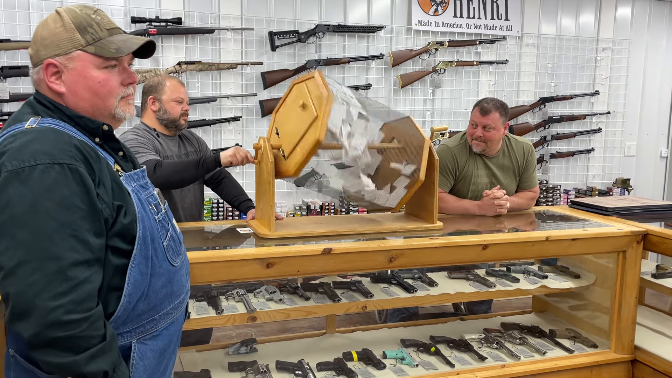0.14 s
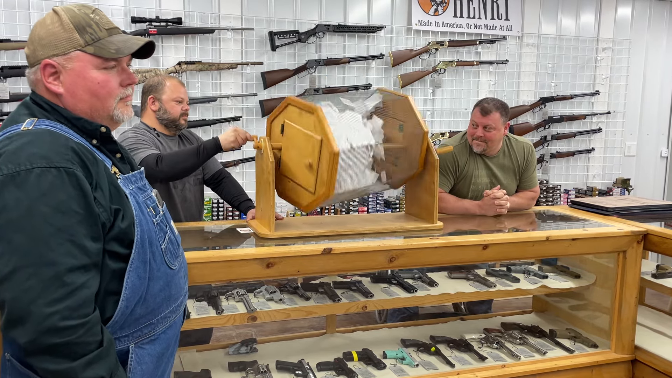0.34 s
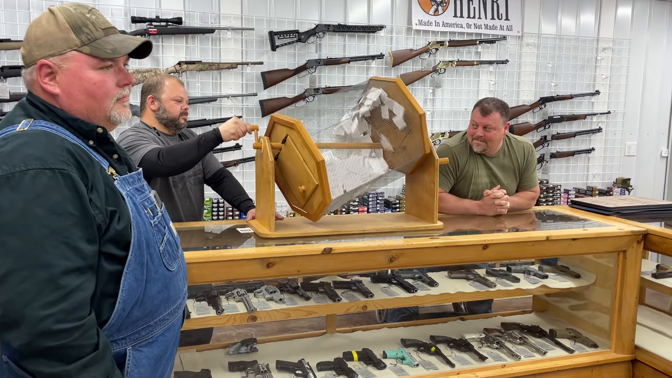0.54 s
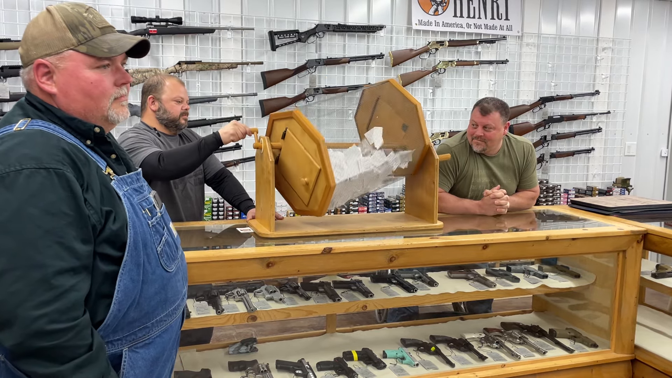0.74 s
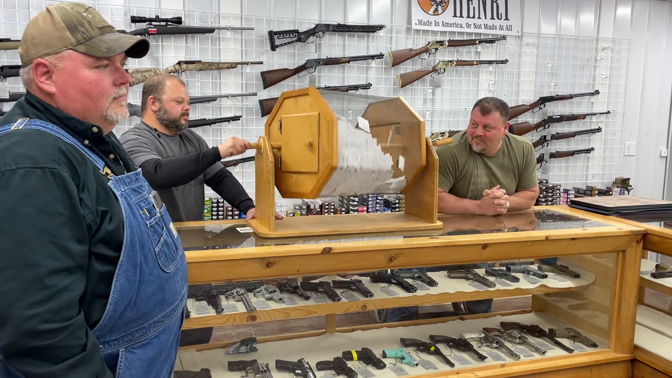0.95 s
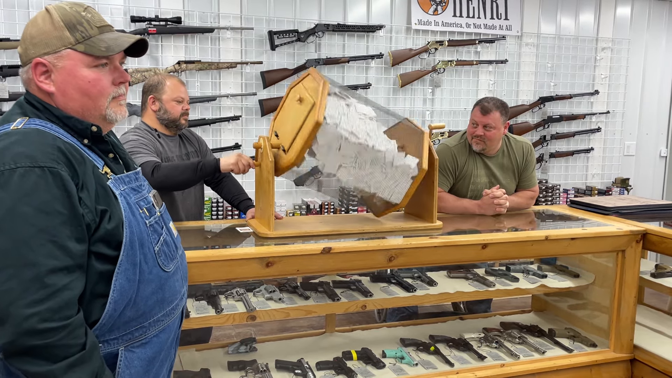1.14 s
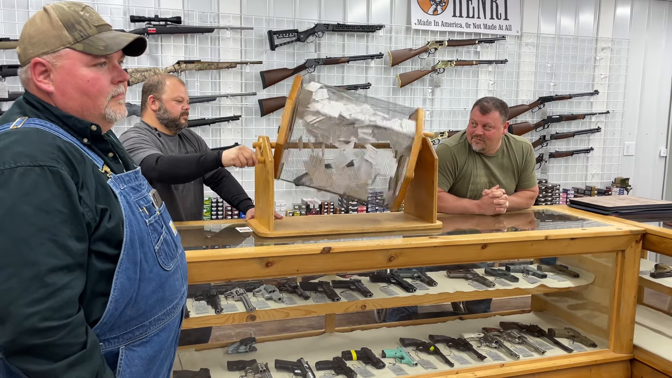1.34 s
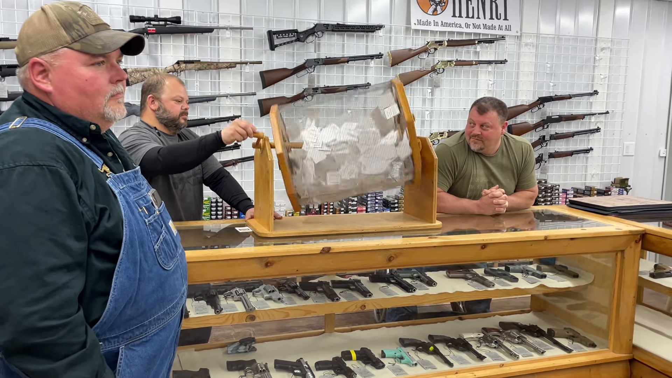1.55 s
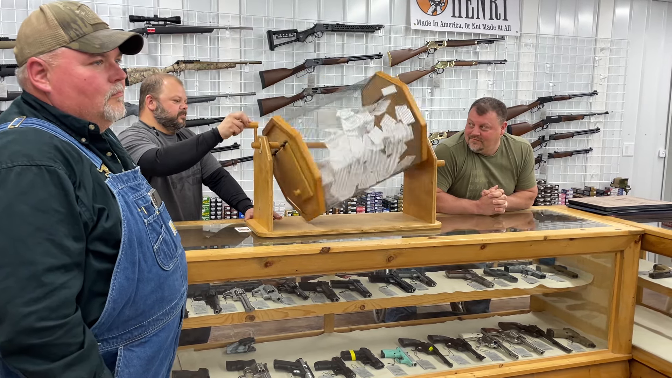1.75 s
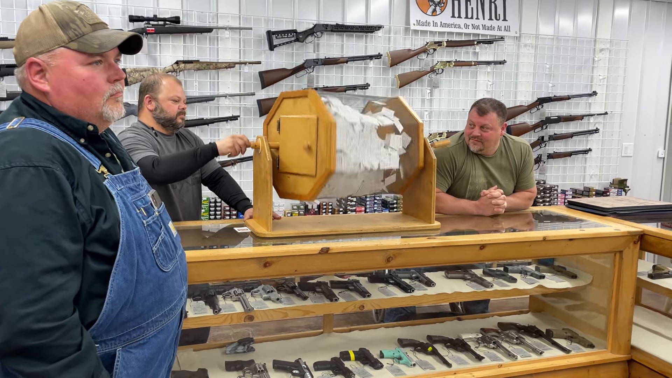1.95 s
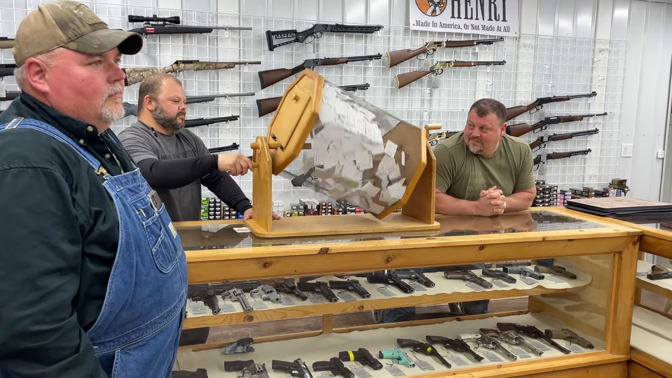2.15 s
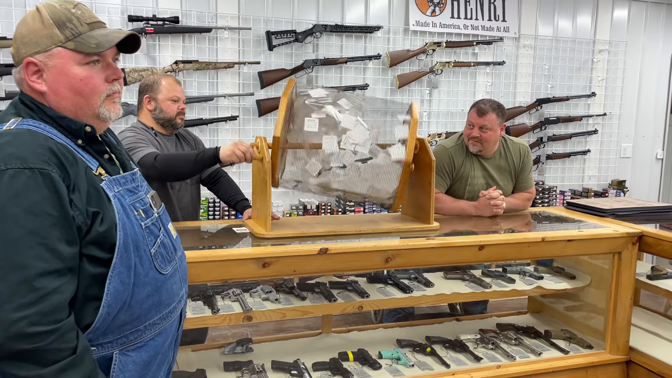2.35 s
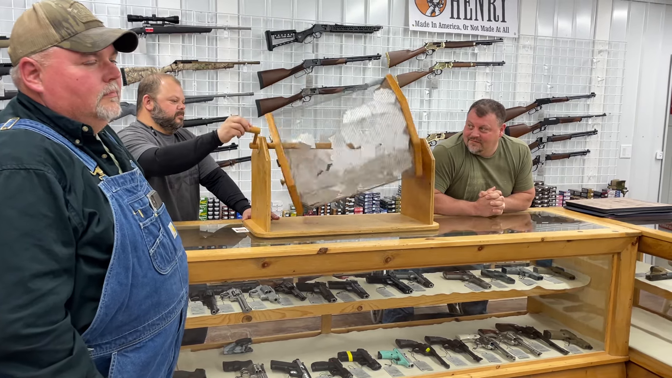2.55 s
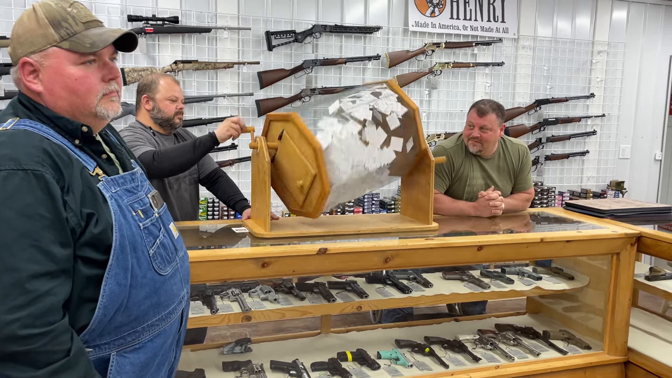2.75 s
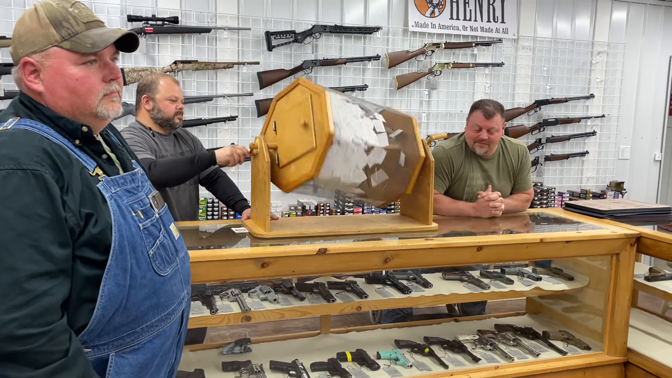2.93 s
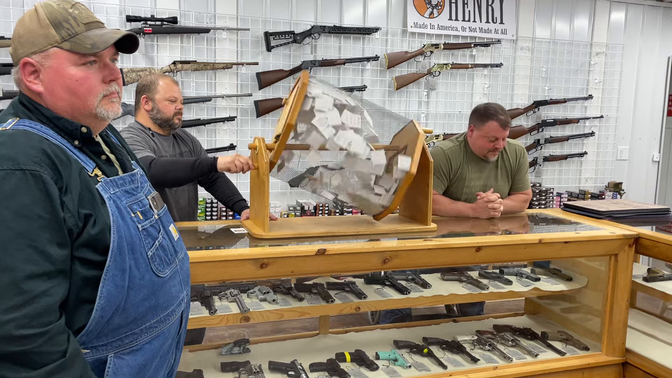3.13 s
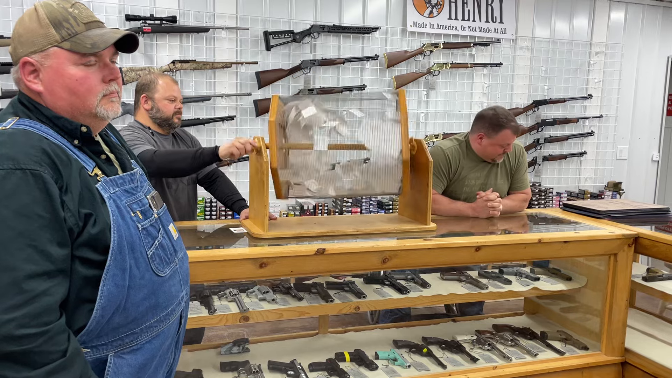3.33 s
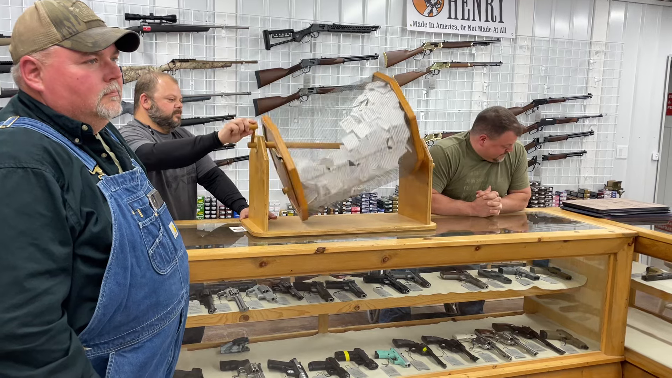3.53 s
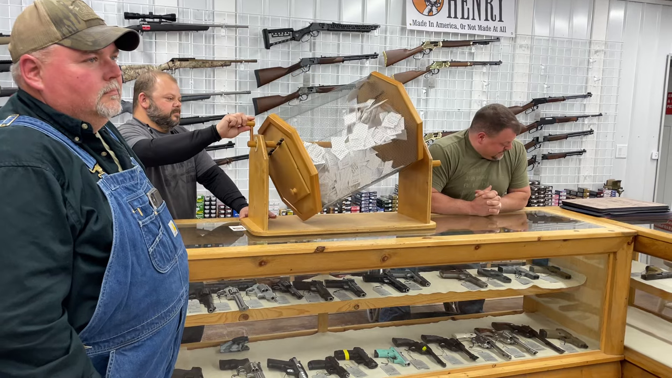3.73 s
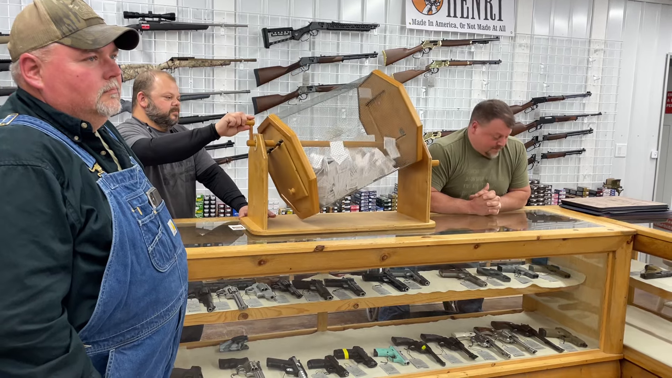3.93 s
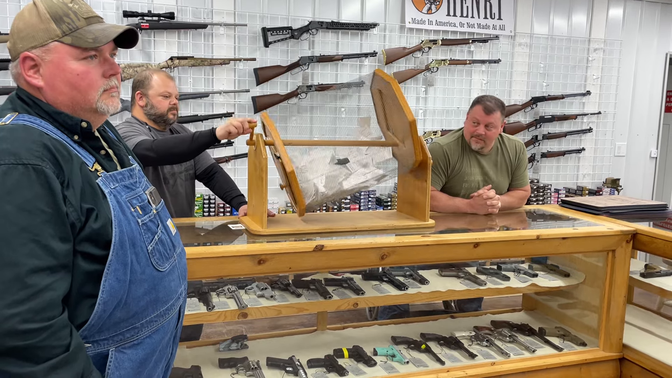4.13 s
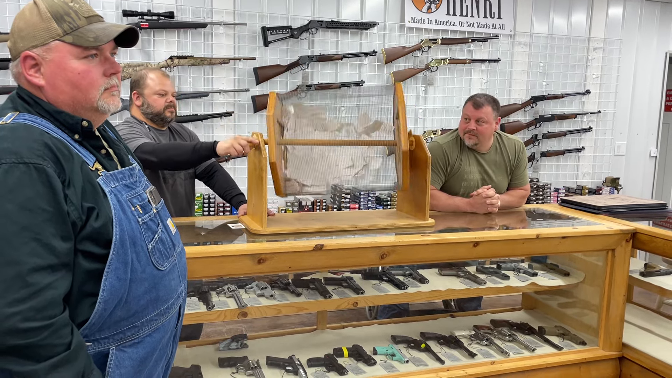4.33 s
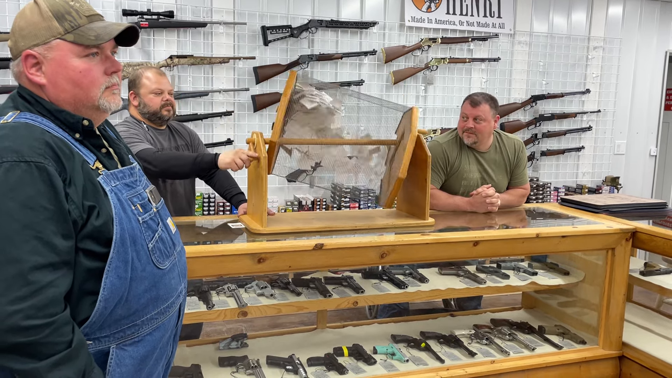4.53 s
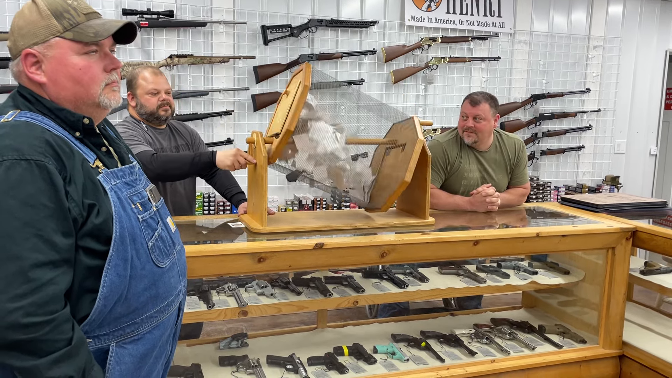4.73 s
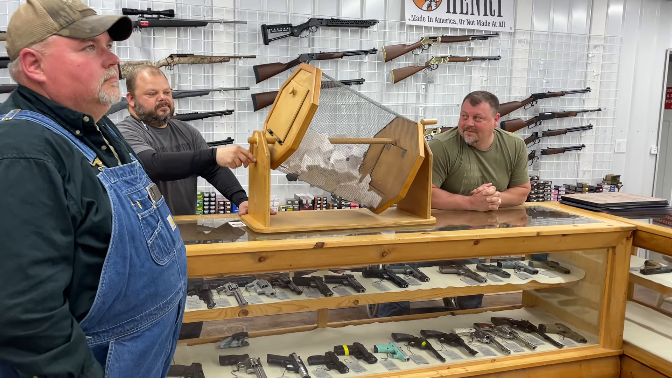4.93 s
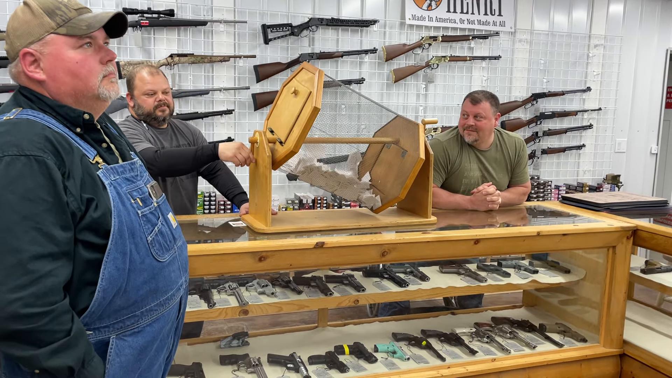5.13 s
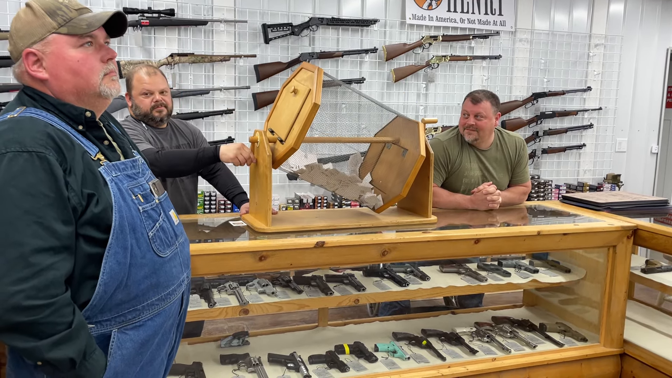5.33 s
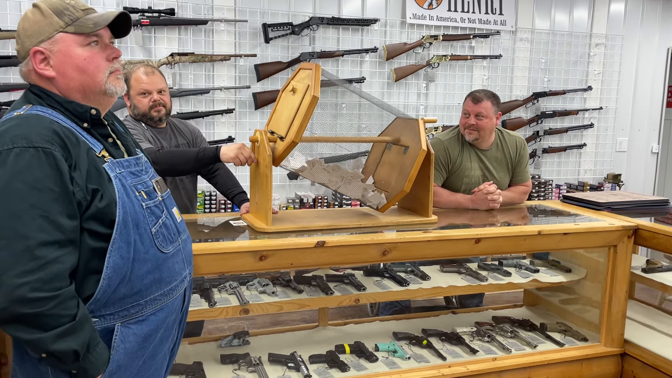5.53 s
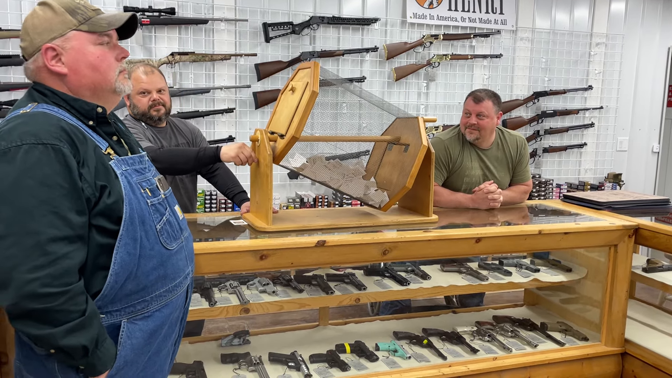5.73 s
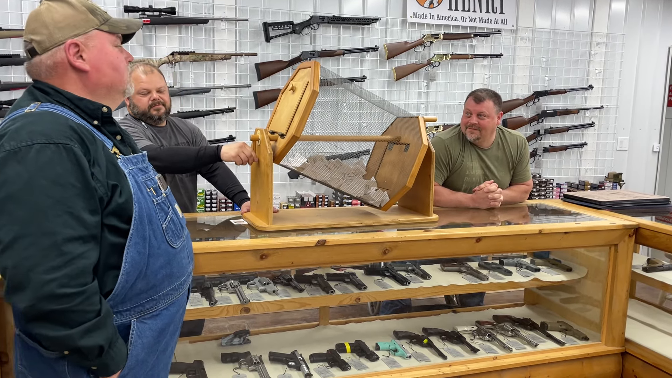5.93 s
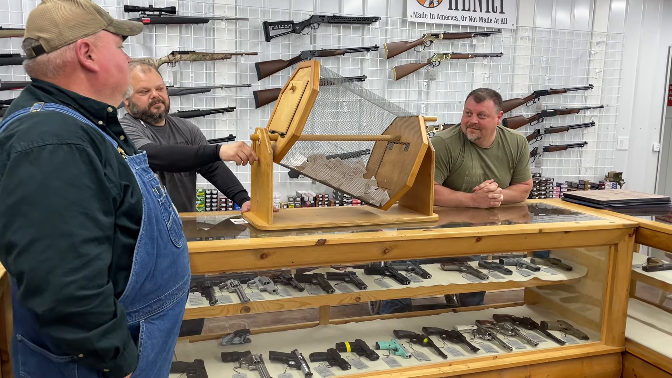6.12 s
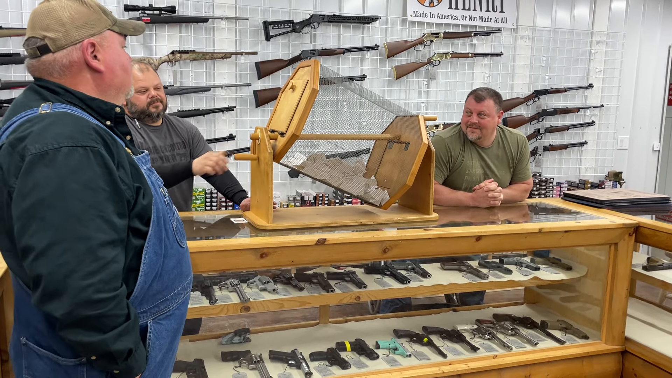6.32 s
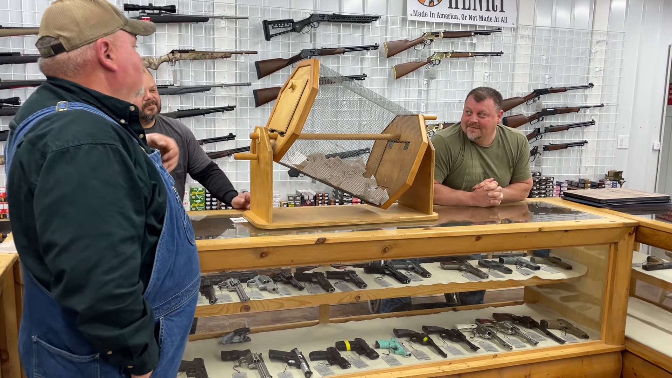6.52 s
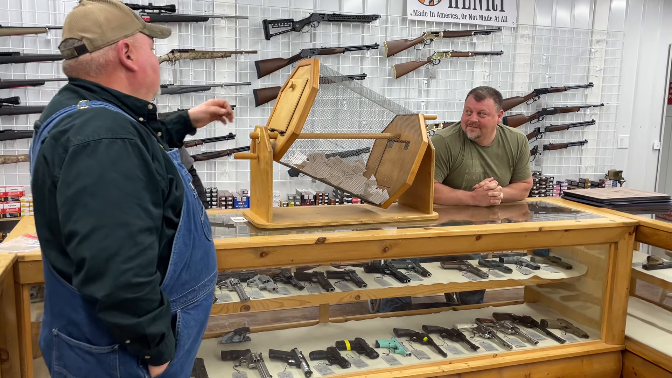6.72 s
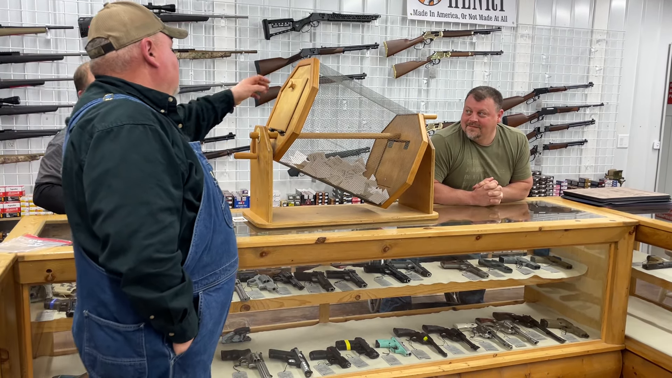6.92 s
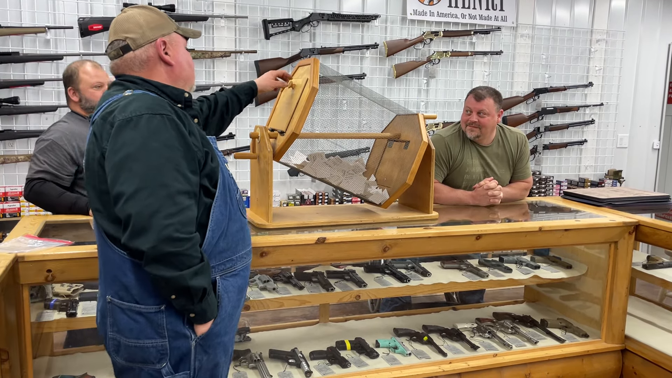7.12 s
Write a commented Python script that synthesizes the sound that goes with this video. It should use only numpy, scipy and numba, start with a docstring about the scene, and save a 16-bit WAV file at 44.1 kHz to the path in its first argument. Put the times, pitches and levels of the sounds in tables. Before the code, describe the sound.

From the start, card tickets slide and tumble inside a hand-cranked raffle drum, rustling in uneven surges and pattering on its walls. The drum hums hollowly and the counter beneath rumbles, with a few dull knocks. Clumps of tickets land with sharp slaps, strongest around 0.7 and 1.3 seconds and again between 3 and 3.8. The rustle eases just after 4 seconds, swells in a last loud tumble near 4.8, and dies away by 5.6 as the drum stops. At about 6 seconds someone shifts their boots softly on the floor. Around 6.5 comes a hard, heavy step, with thuds, creaking boards and scuffing soles, then a lighter footfall near 6.9 and a few faint rubs. The shop's low hum and faint hiss lie behind everything, heard through a phone a few metres away with a short room echo.

```python
"""A hand-cranked raffle drum on a shop counter, a few metres from a phone with two microphone ports.
Card tickets slide, tumble and slap on its clear walls; its air and wooden ends hum along and the
counter rumbles. The drum stops, and a heavy man shifts his boots, once softly and once hard: the floor
thuds, boards creak, soles scuff. Behind it all lie the low hum and faint hiss of the shop."""
import sys
import numpy as np
from scipy import signal
from scipy.fft import rfft, irfft, next_fast_len
from scipy.io import wavfile
from scipy.ndimage import uniform_filter1d
from numba import njit

SR = 44100
rng = np.random.default_rng(int(sys.argv[2]) if len(sys.argv) > 2 else 0)


def wav_record(signal):
    """Record a signal, one row per channel, as 16-bit PCM in the file named by sys.argv[1]."""
    frames = np.transpose(np.atleast_2d(signal))
    bounded = np.clip(frames, -1, 1)
    # unit amplitude maps onto the largest positive 16-bit level
    quanta = np.round(bounded * 32767).astype(np.int16)
    wavfile.write(sys.argv[1], SR, quanta)


N = 316197

# spectrum of the shop's room tone: freq_hz, level_db
ROOM_TONE_SPECTRUM = [(30, -15.5), (90, -0.5), (200, -15), (400, -12.5), (1000, -20.5), (2000, -29),
                      (4000, -30), (8000, -37.5), (14500, -49)]
# the phone turns the background down as the drum stops, then lets it back up:
# time_s, level_db, hiss_gain_db
PHONE_BACKGROUND_LEVELS = [(5.4, -54.5, 0), (5.65, -66.5, -7.5), (5.88, -62.5, -4), (6.0, -59, -3),
                           (6.3, -63, 11), (6.75, -64, 7.5), (6.95, -61.5, 5.5), (7.17, -62, 5.5)]
# faint rubs after the drum stops: start_s, length_s, pitch_hz, width_hz, level_db
RUBS = [(5.8, .35, 2230, 200, -79), (5.872, .25, 3900, 200, -81), (6.01, .04, 1930, 80, -70),
        (6.06, .06, 1910, 150, -73), (6.145, 0.044, 1400, 250, -64), (6.2, .07, 3550, 450, -67),
        (6.21, .05, 2600, 350, -65), (6.49, 0.25, 6060, 3000, -63.5), (7.052, 0.048, 2050, 400, -62.5)]
# boots loading the floor: start_s, level_db, rise_s, fall_db_per_s, scuff_gain_db, creak_gain_db
WEIGHT_SHIFTS = [(6.014, -40, 0.0034, 60.3, -23, 2), (6.074, -42, 0.005, 60.6, -22, -10),
                 (6.385, -51.5, .025, 150, -12, 3), (6.474, -30, 0.0071, 120, -9, -5),
                 (6.488, -23, 0.017, 178, -13, 0), (6.544, -21, 0.013, 330, -22, -9),
                 (6.62, -34.5, 0.0095, 110, -12, -10), (6.675, -43, 0.0099, 160, -22, -4),
                 (6.74, -45, 0.025, 70, -37, -10), (6.895, -45, .012, 60, -34, -22),
                 (7.09, -69, 0.025, 120, -9, -25)]
# heels and soles landing: start_s, level_db, push_ms
FOOTFALLS = [(6.018, -39, 5.4), (6.077, -42, 1.6), (6.123, -33, 5.5), (6.169, -39, 3.6), (6.485, -17, 4.5),
             (6.494, -21, 0.88), (6.502, -12, 2.6), (6.524, -12, 5.1), (6.553, -8.5, 3.2),
             (6.571, -34, 2.5), (6.601, -18, 2.5), (6.905, -27.5, 3.8), (6.954, -35, 14), (6.99, -40, 16)]
# the floor's thudding modes: pitch_hz, width_hz, level_db
FLOOR_MODES = [(52.6, 14, -3.5), (85.4, 23, 1), (111, 15.6, 1.5), (162, 47, -2.5), (255, 81, -6),
               (328, 56, -3)]
# the boards' creaking modes: pitch_hz, width_hz, level_db
BOARD_MODES = [(515, 106, -3.5), (700, 120, 0), (801, 176, 1.5), (897, 190, -1.5), (2070, 530, -11.5)]
# spectrum of a scuffing sole: freq_hz, level_db
SOLE_SPECTRUM = [(800, 5.5), (1500, -4), (4000, -17), (8000, -26.5), (14500, -36)]
# the counter's modes, two deep and one upper: pitch_hz, width_hz, level_db
COUNTER_MODES = [(51, 8, -2.5), (71.1, 12, 2.5), (103, 32.5, 3)]
# the counter's rumble as the drum turns: time_s, deep_db, upper_db
RUMBLE_LEVELS = [(0.0, -55, -64), (0.31, -62, -52.5), (0.72, -44.5, -39), (0.81, -60, -51.5),
                 (1.45, -53, -50), (1.5, -61.5, -44.5), (1.56, -47.5, -47.5), (1.95, -59, -58.5),
                 (2.03, -58, -46), (2.26, -55, -56), (2.4, -64, -48), (2.5, -48, -48), (2.87, -64, -58),
                 (3.24, -52, -58), (3.35, -57, -46.5), (3.45, -58, -59), (3.73, -52, -42),
                 (3.94, -45, -45.5), (4.35, -71, -62), (4.96, -46.5, -55.5), (5.19, -61.5, -60.5),
                 (5.21, -65, -78), (5.4, -69, -72), (5.6, -84, -82)]
# heavier knocks on the counter or a drum wall: start_s, pitch_hz, level_db, rise_s, t60_s
HEAVY_KNOCKS = [(0.66, 104, -34, 0.022, .25), (0.865, 689, -33.5, .02, 0.25), (1.115, 1110, -36, .015, .15),
                (1.495, 99, -38, .02, 0.27), (2.9, 828, -32.5, 0.013, 0.22), (3.925, 71.5, -35, 0.018, .3)]
# modes of the drum's air and ends, two lower and two upper: pitch_hz, width_hz, level_db
DRUM_MODES = [(265, 30, -5), (303, 34, 0), (345, 24, 1), (465, 60, -6)]
# the hum tips between these modes as the drum turns: time_s, lower_db, upper_db
HUM_LEVELS = [(0.0, -59.5, -52), (0.12, -39, -48.5), (0.25, -47, -36), (0.28, -41, -38.5), (0.32, -61, -52),
              (0.36, -41.5, -45), (0.4, -54, -47), (0.52, -47, -37), (0.57, -46.5, -56), (0.62, -49.5, -41),
              (0.73, -44, -52.5), (0.76, -44.5, -39), (1.02, -61, -52), (1.1, -40.5, -53.5),
              (1.33, -42, -42), (1.39, -43.5, -54.5), (1.53, -41, -35), (1.56, -40.5, -57),
              (1.62, -48, -41), (1.79, -48.5, -42.5), (1.85, -52, -48), (2.01, -37.5, -46.5),
              (2.12, -41, -51), (2.16, -41, -38), (2.3, -44, -49), (2.32, -39, -39), (2.72, -51.5, -53.5),
              (3.18, -44, -41), (3.23, -45, -46.5), (3.52, -60, -52), (3.57, -54.5, -59), (3.85, -51, -43),
              (3.88, -53, -56), (3.99, -47, -46.5), (4.3, -67.5, -62), (4.5, -51.5, -60),
              (4.73, -49.5, -55.5), (4.82, -41, -39), (4.95, -43, -37), (4.98, -43, -53.5), (5.1, -68, -44),
              (5.25, -65, -53.5), (5.35, -73, -85), (5.55, -74, -89)]
# shell modes that colour the rustle: pitch_hz, width_hz, level_db
SHELL_MODES = [(300, 160, -4), (830, 60, -5), (1230, 120, -2), (1940, 80, -6)]
# modes of the drum's wall panels: pitch_hz
PANEL_MODES_HZ = [699.6, 825, 982.5, 1109, 1243, 1404, 1594, 1951, 2100, 2364, 2690, 2940, 3560]
# spectrum of card rubbing on card: freq_hz, level_db
CARD_SPECTRUM = [(30, -30), (60, -1.5), (150, -12), (250, 1.5), (500, 2), (800, 1.5), (1300, -1),
                 (2500, 0.5), (4000, -4), (6000, -10.5), (7500, -13), (9500, -15.5), (12000, -23),
                 (14500, -29.5)]
# clumps of tickets landing, and small ticks later:
# start_s, level_db, centre_hz, width_octaves, bright_gain_db, t60_s
TICKET_SLAPS = [(0.0787, -36, 3000, 1.6, -3, .06), (0.1054, -27, 2700, 0.76, -4, .12),
                (0.238, -23, 5000, 1.7, 6, 0.063), (0.3306, -27, 1470, 5.4, 3, 0.17),
                (0.5338, -20.5, 2100, 6, 6, 0.089), (0.548, -20, 1300, 1.8, -11, 0.051),
                (0.581, -23, 2500, 2.9, -8, .05), (0.715, -15.5, 2510, 1.3, -5, 0.057),
                (0.7275, -8.5, 3600, 0.51, 2.5, 0.032), (1.0612, -34, 2540, 0.83, 3, 0.066),
                (1.2476, -14, 6450, 1.15, 2, 0.08), (1.27, -12, 3500, 3.1, 4, 0.095),
                (1.4262, -21, 4170, 2.4, -1, 0.11), (1.9902, -23, 4470, 1.4, -1, 0.13),
                (2.956, -20, 2200, 2.7, 10.5, 0.068), (3.045, -18, 1900, 1.6, -14.5, 0.24),
                (3.109, -19, 1350, 1.2, -13, 0.18), (3.153, -19, 2500, 1.9, -7, 0.069),
                (3.228, -18.5, 1820, 3.4, 1, 0.11), (3.4078, -25, 3000, 1.9, -7, .06),
                (3.5558, -26.5, 2500, 2.9, -12, 0.17), (3.6182, -26.5, 2000, 3.8, -7, 0.15),
                (3.717, -30.5, 1670, 0.73, -5, .12), (3.7913, -22, 3780, 0.48, -10, 0.087),
                (3.8285, -14, 2150, 2.2, -14, 0.092), (4.1585, -22, 3980, 1.4, 8, 0.14),
                (4.6918, -20.5, 2200, 1.5, -7, 0.18), (4.7382, -20, 1720, 1.1, -2, 0.23),
                (4.7689, -16.5, 1590, 2.8, 8.5, 0.28), (4.7831, -14.5, 3360, 3.6, 0, 0.091),
                (4.8257, -18.5, 5500, 1.2, -4, 0.044), (5.17, -42, 3580, 1.8, -2.5, 0.093),
                (5.3496, -45, 4711, 0.93, 0, 0.12), (5.567, -60, 3090, 1.03, 1, .12),
                (6.1985, -49, 3800, 2.1, 7, 0.14), (6.397, -48, 2270, 5.5, 0, .12)]
# the heap slides each time a wall tips over:
# start_s, level_db, rise_s, fall_db_per_s, edge_gain_db, tap_gain_db
HEAP_SLIDES = [(0.0, -38.5, 0.0015, 17, -6, -7), (0.045, -31.5, 0.057, 23, -7, -3),
               (0.32, -36, 0.027, 17, -10, -4.5), (0.44, -35, 0.028, 29, -11.5, -8.5),
               (0.52, -31.5, 0.054, 61, -4.5, -2), (0.712, -28.5, 0.022, 77, -7.5, -6),
               (0.84, -34, 0.043, 87, -18.5, -12), (1.041, -35, 0.043, 2.3, -11, -2.5),
               (1.246, -31, 0.015, 35, -1.5, -6.5), (1.371, -31.5, 0.075, 21, -4.5, -17.5),
               (1.45, -30.5, 0.069, 25, -7.5, -5.5), (1.56, -29, 0.065, 39, -4.5, -7),
               (1.8, -37, 0.072, 27, -8, -2), (1.91, -33, 0.049, 14, -7.5, -0.5),
               (2.02, -33, 0.072, 60, -5.5, -0.5), (2.13, -30, 0.049, 70, -4.5, -3.5),
               (2.26, -31, 0.048, 33, -6.5, -4.5), (2.335, -33, 0.025, 64, -4.5, -8),
               (2.45, -35, 0.11, 43, -2.5, -5), (2.59, -33, 0.054, 100, -4, -4.5),
               (2.76, -35.5, 0.085, 30, -12.5, -0.5), (2.89, -36.5, 0.089, 30, -1.5, -4),
               (3.025, -33, 0.033, 25, -23, -6), (3.08, -36, 0.04, 51, -4.5, -5),
               (3.2, -34, 0.046, 88, -1.5, -22), (3.32, -37, 0.04, 12, -11.5, -8.5),
               (3.62, -38, 0.11, 25, -11.5, -2), (3.775, -32.5, 0.03, 22, -10, -6.5),
               (3.81, -31.5, 0.067, 72, -2, -3), (4.15, -44, 0.01, 29, -2.5, -7.5),
               (4.34, -44, 0.085, 4.1, -7.5, -5.5), (4.5, -40.5, 0.14, 33, -13.5, -0.5),
               (4.675, -33.5, 0.047, 6.9, -5.5, -3.5), (4.73, -28, 0.13, 78, -6, -11.5),
               (4.998, -37.5, 0.032, 94, -28.5, -8)]
# how alike the two microphone ports hear: freq_hz, coherence (0 to 1)
MIC_COHERENCE = [(60, .97), (150, .9), (340, .74), (900, .55), (2400, .52), (3500, .7), (5500, .5),
                 (7000, .6), (7900, .985), (8600, .985), (9600, .85), (11200, .995), (12200, .97),
                 (13200, .7), (14000, .9995)]
# phase between the ports: freq_hz, left_lead_half_turns
MIC_PHASE = [(0, 0), (1900, 0), (3000, .2), (5000, .2), (6200, -.13), (7000, -.35), (7900, -.98),
             (8500, -1.02), (9200, -1.3), (11000, -2), (12300, -2.03), (13300, -2.5), (14000, -3)]
# balance of the ports, added on the left and taken off the right: freq_hz, gain_db
MIC_BALANCE = [(60, -.9), (200, -.5), (500, .1), (3000, .55), (5000, .4), (7000, -.1)]

ROOM_T60_S, ROOM_DB, FINE_HISS_DB = 0.22, -9.5, 4.5
MIC_LOW_HZ, MIC_TOP_HZ = 38.2, 15850
SETTLE_S, SETTLE_DB_PER_S = 0.24, 54  # this long after its peak a movement runs out faster
DULLING_DB_PER_S = 11  # the tickets' edges die away sooner than their faces
STOP_S, STOP_FADE_S = 5.6, 0.13
WALL_HZ, WALL_WANDER_OCTAVES = 1298, 0.2
TAPS_PER_S, TAP_SCATTER_OCTAVES, TAP_T60_S = 450, .5, .08
FLICKS_PER_S, FLICK_HZ, FLICK_SCATTER_OCTAVES, FLICK_T60_S, FLICK_DB = 600, 3300, .6, .03, -9.5
SNAP_DB, SHOWER_RISE_SHARE = -2, .015  # a shower of card rises in this share of its t60


def undb(db):
    """Decibels to gain."""
    return 10 ** (np.asarray(db) / 20)


def unit(x):
    """Scale to rms 1."""
    return x / np.sqrt(np.mean(x ** 2))


def curves(table):
    """The level columns of a table over time, at every sample."""
    times, *columns = np.transpose(table)
    return [np.interp(np.arange(N) / SR, times, column) for column in columns]


def bins():
    """Frequencies of the spectrum lines, above zero."""
    return np.maximum(np.arange(next_fast_len(N) // 2 + 1) * SR / next_fast_len(N), 1)


def shaped(x, gain):
    """Filter by a gain on each spectrum line."""
    return irfft(rfft(x, next_fast_len(N)) * gain, next_fast_len(N))[..., :N]


def colour(points):
    """Gain through points of freq_hz, level_db."""
    hz, db = np.transpose(points)
    return undb(np.interp(np.log(bins()), np.log(hz), db))


def ring(modes):
    """Gain of a set of resonances, neighbours in opposite sign."""
    f = bins()
    return sum((-1) ** k * undb(db) * 1j * f * width / (hz ** 2 - f ** 2 + 1j * f * width)
               for k, (hz, width, db) in enumerate(modes))


def steady(x):
    """Ease the beating of a narrow ring: the heap keeps it fed."""
    envelope = np.abs(signal.hilbert(x, next_fast_len(N))[:, :N])
    return unit(x / (envelope + 1e-9) ** .6)


def grains(per_s, spread_db):
    """Random clicks of either sign, most small and a few large; two unrelated streams."""
    out = np.zeros((2, N))
    hit = rng.random((2, N)) < per_s / SR
    size = np.minimum(rng.exponential(size=hit.sum()), 4)
    out[hit] = rng.standard_normal(hit.sum()) * undb(spread_db * size)
    return unit(out)


def walk(per_s):
    """A random wander that glides to a new value per_s times a second."""
    hold = int(SR / per_s)
    return 0.72 * uniform_filter1d(np.repeat(rng.standard_normal(N // hold + 1), hold), hold)[:N]


def surge(start_s, db, rise_s, fall_db_per_s):
    """Gain of one movement: a smooth rise, a steady fall, then a quicker settling."""
    t = np.arange(N) / SR - start_s
    rise_s = max(rise_s, .003)
    after = np.maximum(t - rise_s, 0)
    drop_db = fall_db_per_s * after + SETTLE_DB_PER_S * np.maximum(after - SETTLE_S, 0)
    return np.sin(np.pi / 2 * np.clip(t / rise_s, 0, 1)) ** 2 * undb(db - drop_db)


@njit
def pings(start, hz, size, t60_s):
    """A dying sine from each start sample, with its own pitch and size."""
    out = np.zeros(N)
    fade = np.exp(-np.log(1000) / (t60_s * SR))
    for k in range(len(start)):
        turn = 2 * np.pi * hz[k] / SR
        feedback = 2 * fade * np.cos(turn)
        now, before = size[k] * np.sin(turn), 0.
        for i in range(start[k], min(N, start[k] + int(6 / (1 - fade)))):
            out[i] += now
            now, before = feedback * now - fade ** 2 * before, now
    return out


def room_tone():
    """The shop's low wavering hum, faint hiss and finest hiss, at the level the phone lets through."""
    level_db, hiss_db = curves(PHONE_BACKGROUND_LEVELS)
    air = unit(shaped(rng.standard_normal((2, N)), colour(ROOM_TONE_SPECTRUM)))
    low = shaped(air, 1 / (1 + (bins() / 980) ** 4))
    fine = shaped(air, 1 / (1 + (11000 / bins()) ** 6))
    hiss = air - low - fine + fine * undb(FINE_HISS_DB)
    return undb(level_db) * (low * undb(2 * walk(2.1)) + hiss * undb(hiss_db))


def shop_echoes(direct):
    """A few metres off, the direct sound comes with a short tail of echoes, thin in bass and treble."""
    t = np.arange(int(.5 * SR)) / SR
    echoes = rng.standard_normal((2, len(t))) * np.exp(-np.log(1000) * t / ROOM_T60_S) * (t > .004)
    echoes = signal.sosfilt(signal.butter(1, [250, 6000], "band", fs=SR, output="sos"), echoes)
    echoes *= undb(ROOM_DB) / np.sqrt(np.sum(echoes ** 2, axis=1, keepdims=True))
    wet = signal.fftconvolve(direct, echoes, axes=1)[:, :N]
    return (direct + wet) / np.sqrt(1 + undb(ROOM_DB) ** 2)


def rubs():
    """Short faint rubs, most of them narrow enough in pitch to squeak."""
    out, t = np.zeros(N), np.arange(N) / SR
    noise = rng.standard_normal(N)
    for start_s, length_s, hz, width, db in RUBS:
        swell = np.sin(np.pi * np.clip((t - start_s) / length_s, 0, 1))
        out += undb(db) * unit(shaped(noise, ring([(hz, width, 0)]) ** 2)) * swell
    return out


def boots():
    """Weight rolls onto the floor in uneven slips; heels land, boards creak and soles scuff."""
    push, scuff, creak = np.zeros((3, N))
    for start_s, db, rise_s, fall, scuff_db, creak_db in WEIGHT_SHIFTS:
        load = surge(start_s, db, rise_s, fall)
        push += load
        scuff += load * undb(scuff_db)
        creak += load * undb(creak_db)
    landings = np.zeros((2, N))
    for start_s, db, push_ms in FOOTFALLS:
        i, length = int(start_s * SR), int(push_ms * SR / 1000)
        landings[0, i:i + length] -= undb(db) * np.hanning(length)
    slips = uniform_filter1d(grains(2200, 1.5), 30)  # rubber gives: each slip is a soft push
    floor_slips = slips / np.std(shaped(slips[0], ring(FLOOR_MODES)))
    board_slips = slips / np.std(shaped(slips[0], ring(BOARD_MODES)))
    floor_force = floor_slips * push * undb(-3.5) + landings * undb(-1)
    # a landing is heard as the floor's ring and as its own push of air
    thud = shaped(floor_force, ring(FLOOR_MODES)) + landings * undb(-3)
    boards = shaped(board_slips * creak * undb(-11.5), ring(BOARD_MODES))
    sole = unit(shaped(grains(12000, 2.1), colour(SOLE_SPECTRUM)))
    return thud + boards + sole * scuff * undb(1.5)


def counter_rumble():
    """The tickets' blows jolt the counter under the drum and ring its low modes."""
    deep_db, upper_db = curves(RUMBLE_LEVELS)
    jolts = grains(400, 1)
    deep = unit(shaped(jolts, ring(COUNTER_MODES[:2])))
    upper = steady(shaped(jolts, ring(COUNTER_MODES[2:])))
    return undb(deep_db) * deep + undb(upper_db) * upper


def knocks():
    """Soft-edged blows each ring one mode of the counter or a wall, in the stream both ports share."""
    out, t = np.zeros((2, N)), np.arange(SR // 2) / SR
    for start_s, hz, db, rise_s, t60_s in HEAVY_KNOCKS:
        swell = np.minimum(t / rise_s, 1) * np.exp(-np.log(1000) * np.maximum(t - rise_s, 0) / t60_s)
        i = int(start_s * SR)
        out[0, i:i + len(t)] += undb(db) * swell * np.sin(2 * np.pi * (hz * t + rng.random()))
    return out


def drum_hum():
    """Many small blows keep the drum's air and wooden ends humming."""
    lower_db, upper_db = curves(HUM_LEVELS)
    blows = grains(3000, 1)
    lower = steady(shaped(blows, ring(DRUM_MODES[:2]) ** 2))
    upper = steady(shaped(blows, ring(DRUM_MODES[2:]) ** 2))
    return undb(lower_db) * lower + undb(upper_db) * upper


def wall_taps():
    """Wall panels ping as single tickets fall on them, scattered around a wandering pitch."""
    count = int(TAPS_PER_S * N / SR)
    centre_hz = WALL_HZ * 2 ** (WALL_WANDER_OCTAVES * walk(6))
    streams = []
    for _ in range(2):
        when, size = rng.random((count, 2)).T
        start = (when * N).astype(np.int64)
        hz = centre_hz[start] * 2 ** (TAP_SCATTER_OCTAVES * rng.standard_normal(count))
        # each tap rings the nearest panel mode, a little off as the heap loads it
        nearest = np.argmin(abs(np.log(hz[:, None] / PANEL_MODES_HZ)), axis=1)
        hz = np.array(PANEL_MODES_HZ)[nearest] * (1 + 0.021 * rng.standard_normal(count))
        streams.append(pings(start, hz, undb(11 * size), TAP_T60_S))
    return unit(np.array(streams))


def corner_flicks():
    """Ticket corners flick with short dry pings, each at its own pitch."""
    count = int(FLICKS_PER_S * N / SR)
    streams = []
    for _ in range(2):
        hz = np.minimum(FLICK_HZ * 2 ** (FLICK_SCATTER_OCTAVES * rng.standard_normal(count)), .3 * SR)
        when, size = rng.random((count, 2)).T
        streams.append(pings((when * N).astype(np.int64), hz, undb(12 * size), FLICK_T60_S))
    return unit(np.array(streams))


def ticket_slaps():
    """A clump lands with a snap and a quickly thinning shower of card."""
    out, t = np.zeros((2, N)), np.arange(SR // 5) / SR
    for start_s, db, hz, octaves, bright_db, t60_s in TICKET_SLAPS:
        rise = np.minimum(t / (SHOWER_RISE_SHARE * t60_s), 1)
        fall = np.exp(-np.log(1000) * t / t60_s)
        half_band = 2 ** (max(octaves, .05) / 2)
        b, a = signal.butter(2, [hz / half_band, min(hz * half_band, .45 * SR)], "band", fs=SR)
        noise = rng.standard_normal((3, 2, len(t)))
        shower = unit(signal.lfilter(b, a, noise[0])) * fall * rise
        # card is soft: the top of the broad scatter is rolled off
        scatter = undb(-17.5) * signal.lfilter([1], [1, -.5], noise[1]) * fall
        snap = undb(SNAP_DB) * noise[2] * np.exp(-t / 0.001)
        slap = shower + undb(bright_db) * (scatter + snap)
        i = int(start_s * SR)
        out[:, i:i + len(t)] += undb(db - 8.5) * slap[:, :N - i]
    return out


def card_rustle():
    """Card rubs in flurries of dense grains: dull faces below 5 kHz, crisp edges above."""
    card = grains(16000, 0.98) * undb(walk(30))
    low_pass = 1 / (1 + (bins() / 5000) ** 4)
    # the lowest shell mode swallows the rustle under the hum, the upper ones ring with it
    shell = 1 - ring(SHELL_MODES[:1]) + sum(ring([mode]) for mode in SHELL_MODES[1:])
    faces = unit(shaped(card, colour(CARD_SPECTRUM) * low_pass * shell))
    edges = unit(shaped(card, colour(CARD_SPECTRUM) * (1 - low_pass)))
    return faces, edges


def raffle_drum():
    """Each slide of the heap swells the rustle, flicks and taps over hum and rumble, until the stop."""
    face_power, tap_power, edge_power = np.zeros((3, N))
    for start_s, db, rise_s, fall, edge_db, tap_db in HEAP_SLIDES:
        face_power += surge(start_s, db, rise_s, fall) ** 2
        tap_power += surge(start_s, db + tap_db, rise_s, fall) ** 2
        edge_power += surge(start_s, db + edge_db, rise_s, fall + DULLING_DB_PER_S) ** 2
    faces, edges = card_rustle()
    body = drum_hum() + counter_rumble()
    tickets = np.sqrt(face_power) * (faces + undb(FLICK_DB) * corner_flicks())
    tickets += np.sqrt(tap_power) * wall_taps() + np.sqrt(edge_power) * edges
    turning = np.clip((STOP_S - np.arange(N) / SR) / STOP_FADE_S, 0, 1)
    return (tickets + body) * turning


def mic_ports(pair):
    """Two streams become what the ports share and what parts them; the case turns the treble's phase."""
    hz, coherence = np.transpose(MIC_COHERENCE)
    coherence = np.interp(np.log(bins()), np.log(hz), coherence)
    shared, apart = shaped(pair, np.sqrt((1 + np.array([coherence, -coherence])) / 2))
    half_turns = np.interp(bins(), *np.transpose(MIC_PHASE))
    left_gain = colour(MIC_BALANCE) * np.exp(.5j * np.pi * half_turns)
    return shaped(np.array([shared + apart, shared - apart]), np.array([left_gain, 1 / left_gain]))


def scene():
    """At the phone: the turning drum, single sounds with their echoes, and the shop's room tone."""
    drum = raffle_drum()
    single_sounds = ticket_slaps() + boots() + rubs() + knocks()
    return mic_ports(drum + shop_echoes(single_sounds) + room_tone())


def record(dry):
    """The phone loses the deepest bass and cuts the top."""
    low_cut = signal.butter(5, MIC_LOW_HZ, "high", fs=SR, output="sos")
    top_cut = signal.ellip(10, .2, 80, MIC_TOP_HZ, fs=SR, output="sos")
    return signal.sosfilt(top_cut, signal.sosfilt(low_cut, dry))


dry = scene()
out = record(dry)
wav_record(out)
```